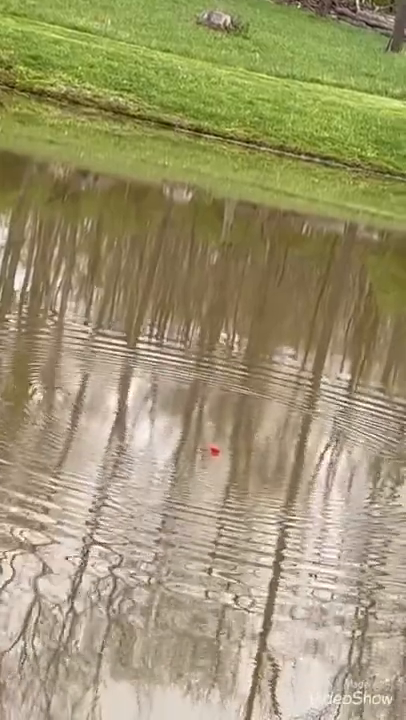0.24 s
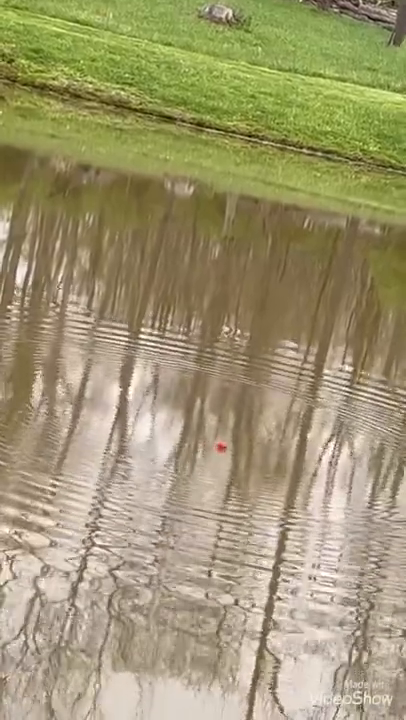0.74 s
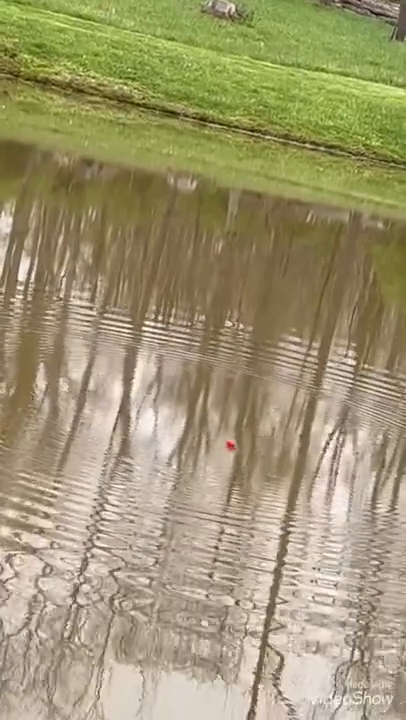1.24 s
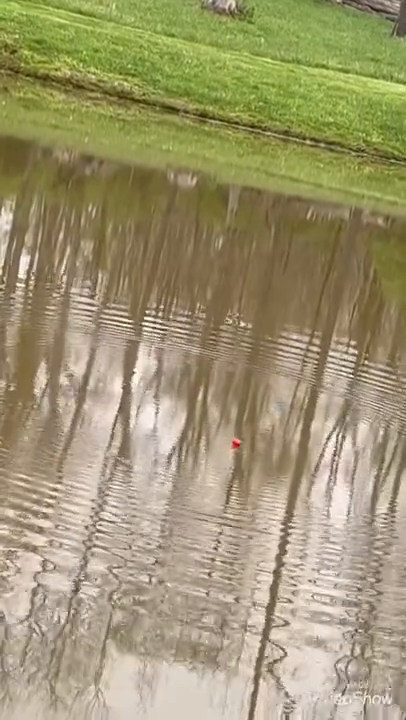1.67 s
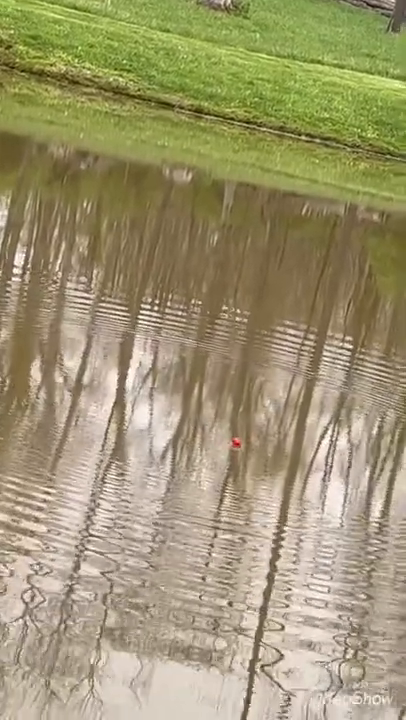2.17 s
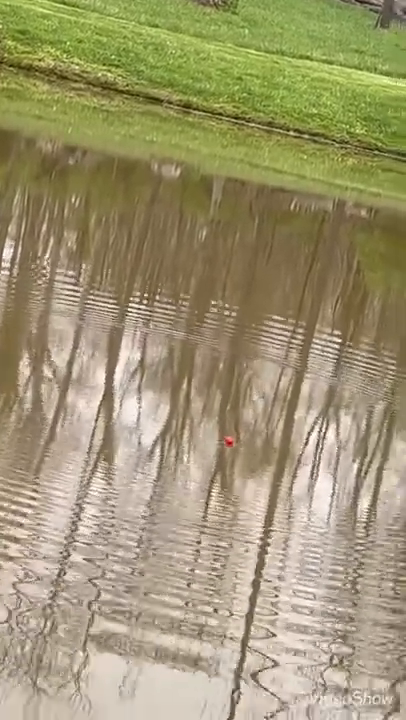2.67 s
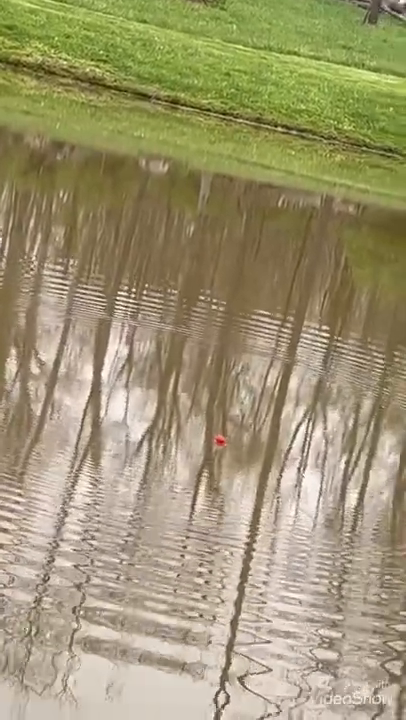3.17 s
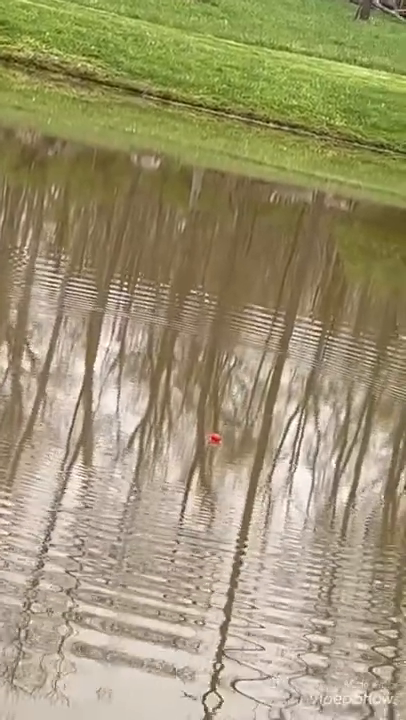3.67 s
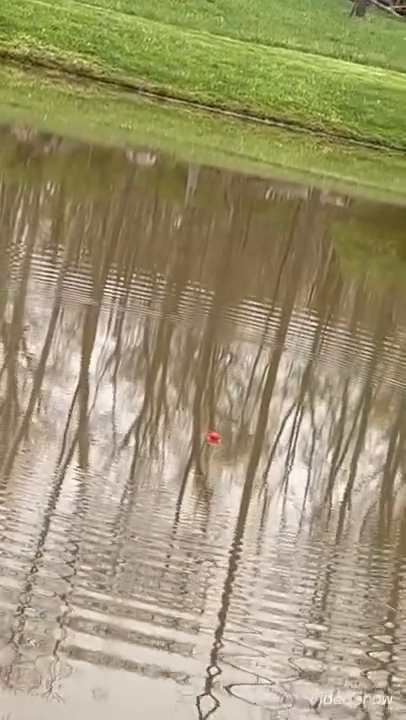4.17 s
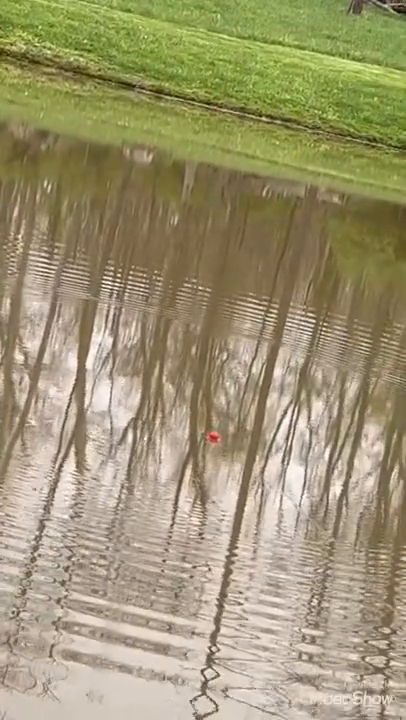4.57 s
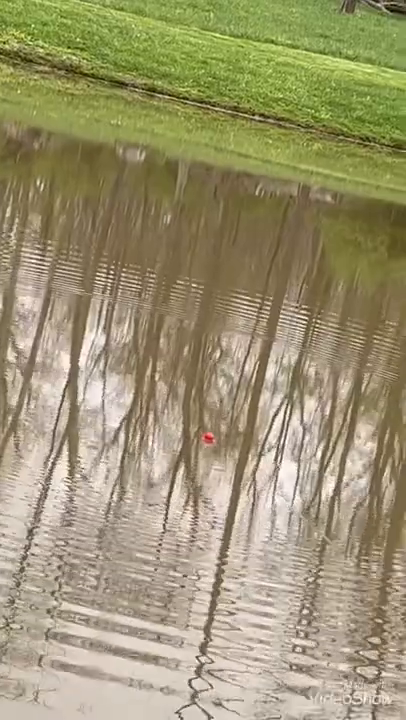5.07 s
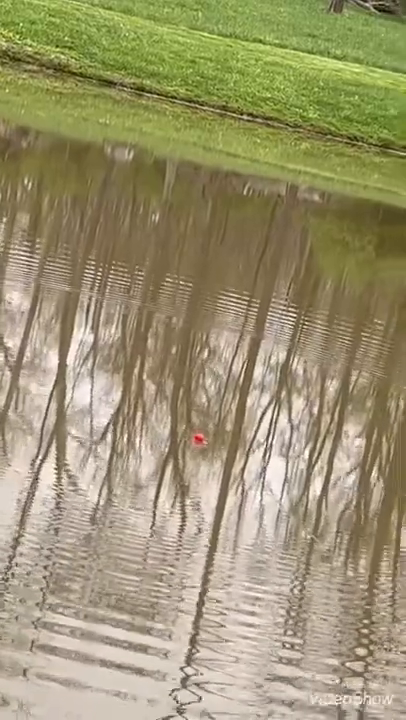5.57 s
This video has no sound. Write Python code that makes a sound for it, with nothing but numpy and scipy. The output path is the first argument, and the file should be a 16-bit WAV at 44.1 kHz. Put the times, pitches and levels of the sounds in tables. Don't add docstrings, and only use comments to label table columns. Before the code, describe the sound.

Birds whistle and trill around a wooded pond over a low traffic rumble and a wavering motor hum, with three tiny twig clicks.

```python
import sys
import numpy as np
from scipy import signal
from scipy.fft import rfft, irfft, next_fast_len
from scipy.io import wavfile
from scipy.ndimage import uniform_filter1d

SR = 44100
rng = np.random.default_rng(int(sys.argv[2]) if len(sys.argv) > 2 else 0)


def gain_from_db(level_db):
    decades = np.asarray(level_db, float) / 20
    return 10 ** decades


def digitize_waveform(pressure):
    field = np.atleast_2d(pressure).T
    bounded = np.clip(field, -1, 1)
    quanta = np.round(bounded * 32767).astype(np.int16)
    wavfile.write(sys.argv[1], SR, quanta)


N = 256662

# (time in note [s], pitch [Hz], level under top [dB])
NOTE_SHAPES = dict( flick=[(0, 4050, 3), (.008, 4650, -3), (.02, 5230, -2.5), (.03, 5700, -10)],
               hold=[(0, 3150, -9), (.011, 3300, -2), (.021, 3243, -2), (.032, 3200, -15.5)],
               dip=[(0, 2800, -10.5), (.014, 2620, -6), (.028, 2380, -3), (.042, 2334, -8)],
               lift=[(0, 2330, -19), (.012, 2540, -5.5), (.024, 2850, -1), (.036, 3010, -7.5)],
               droop=[(0, 2315, -6), (.018, 2490, 1), (.035, 2370, -3), (.053, 2096, -5.5),
               (.068, 1802, -17), (.088, 1520, -15.5), (.11, 1410, -22.5)])
# (start [s], note name, top level [dB])
NOTES_SUNG = [(0.077, "flick", -61), (0.162, "hold", -55), (0.212, "dip", -46.5), (0.299, "lift", -48.5),
              (.362, "droop", -49.5), (.597, "flick", -64), (0.688, "hold", -53), (0.739, "dip", -47.5),
              (0.827, "lift", -48), (0.894, "droop", -51), (5.043, "flick", -67), (5.13, "hold", -55.5),
              (5.182, "dip", -49.5), (5.267, "lift", -51), (5.334, "droop", -51), (5.553, "flick", -64),
              (5.641, "hold", -48.5), (5.692, "dip", -45), (5.776, "lift", -49.5)]


def near_bird():
    return whistle([placed(NOTE_SHAPES[note], s, db) for s, note, db in NOTES_SUNG], edge_s=.003)


# (time in slur [s], pitch [Hz], level under top [dB])
SLUR_HALVES = [
    [(0, 2950, -8), (.013, 3010, -0.5), (.025, 3340, -11), (.036, 3590, -1.5)],
    [(.05, 3580, -13), (.06, 2900, 1), (.075, 2650, -8.5), (.105, 2240, -11), (.145, 1985, -8.5),
     (.188, 1820, -14)],
]
# (start [s], top level [dB])
SLUR_STARTS = [
    (2.036, -61),
    (4.403, -67),
]
# (start [s], length [s], from [Hz], to [Hz], top level [dB])
SETTLING_NOTES = [(.915, .13, 3180, 2860, -66), (1.425, .04, 3590, 3150, -68),
                  (1.47, 0.047, 2330, 2240, -72), (1.53, 0.064, 2220, 2180, -72.5),
                  (1.595, .045, 2874, 2580, -65), (1.715, 0.057, 2190, 2200, -75.5),
                  (1.985, 0.048, 2610, 2640, -71), (3.825, .025, 3010, 2950, -86),
                  (4.235, .07, 3270, 3220, -89.5), (4.35, .045, 2760, 2700, -78),
                  (4.35, .045, 2400, 2390, -82), (4.885, .06, 3560, 2888, -68),
                  (4.95, 0.081, 2840, 2850, -69)]
# (start [s], length [s], from [Hz], to [Hz], top level [dB])
STRAIGHT_NOTES = [
    (.362, .04, 2850, 3585, -66),
    (3.635, 0.06, 3510, 2436, -89),
    (4.995, .065, 2806, 2207, -68.5),
]


def far_bird():
    notes = [placed(half, s, db) for s, db in SLUR_STARTS for half in SLUR_HALVES]
    notes += [glide(*row, settle=3.8) for row in SETTLING_NOTES]
    notes += [glide(*row, settle=.3) for row in STRAIGHT_NOTES]
    shimmer_db = 3.5 * evened(resonate(rng.standard_normal(N), 0, 120))
    return whistle(notes, edge_s=0.0048) * gain_from_db(shimmer_db)


def placed(shape, s, db):
    return np.add(shape, [s, 0, db])


def glide(s, length, from_hz, to_hz, db, settle):
    u = np.linspace(0, 1, 10)
    settled = (1 - np.exp(-settle * u)) / (1 - np.exp(-settle))
    level_db = db + np.interp(u, [0, 1 / 3, 1], [-7.5, 0, -1])
    return np.transpose([s + length * u, from_hz + (to_hz - from_hz) * settled, level_db])


def whistle(notes, edge_s):
    out = np.zeros(N)
    for rows in notes:
        s, hz, db = np.transpose(rows)
        t = np.arange(s[0] - edge_s, s[-1] + edge_s, 1 / SR)
        pitch = uniform_filter1d(np.interp(t, s, hz), size=300)
        ends = np.clip(np.minimum(t - t[0], t[-1] - t) / (2 * edge_s), 0, 1)
        tone = np.sqrt(2) * np.sin(2 * np.pi * np.cumsum(pitch) / SR)
        add(out, t[0], gain_from_db(np.interp(t, s, db)) * ends * tone)
    return out


# (time [s], level [dB], middle pitch [Hz])
TRILL_COURSE = [(0, -75.5, 4000), (.8, -71.5, 3990), (1.2, -77.5, 4150), (1.5, -73.5, 4090),
                (2, -70.5, 3997), (2.4, -71.5, 4020), (2.8, -73, 3910), (3.6, -73, 4016), (4.5, -71, 4004),
                (4.8, -72.5, 4140), (5.3, -74.5, 4120), (5.5, -71, 4050), (5.82, -70.5, 4040)]
# (first chip [s], last chip [s], chips [count])
CHIP_RUNS = [(.02, .057, 2), (.112, .217, 4), (.277, .421, 5), (.493, .736, 8), (.79, .968, 6),
             (1.098, 1.312, 8), (1.347, 2.009, 21), (2.035, 2.134, 4), (2.194, 2.437, 8), (2.477, 2.55, 3),
             (2.605, 2.712, 4), (2.773, 2.984, 7), (3.052, 3.225, 6), (3.261, 3.523, 8), (3.578, 3.866, 9),
             (3.911, 4.02, 4), (4.074, 4.214, 5), (4.29, 4.732, 13), (4.764, 5.525, 24), (5.592, 5.795, 7)]
# (first chip [s], last chip [s], chips [count], level [dB])
ANSWER_RUNS = [
    (.951, 1.055, 4, -4),
    (1.626, 1.692, 3, -2),
    (2.144, 2.312, 6, -2),
    (3.507, 4.297, 25, -3),
    (4.46, 4.56, 4, -1),
    (5.441, 5.54, 4, -1),
]


def trill(fall_hz=40000, length_s=.02, spread=.009, uneven_db=1.5, answer_up_hz=129.8):
    out = np.zeros(N)
    t = np.arange(-length_s / 2, length_s / 2, 1 / SR)
    level_db, hz = curves(TRILL_COURSE)
    chips = [(s, 0, 0) for run in CHIP_RUNS for s in np.linspace(*run)]
    chips += [(s, db, answer_up_hz) for *run, db in ANSWER_RUNS for s in np.linspace(*run)]
    chances = rng.standard_normal((len(chips), 4))
    for (s, db, up_hz), (pitch, slope, size, path) in zip(chips, chances):
        middle_hz = hz[round(s * SR)] * (1 + spread * pitch) + up_hz
        turns = middle_hz * t - fall_hz * (1 + .1 * slope) * t ** 2 / 2
        chip = gain_from_db(db + uneven_db * size) * np.hanning(len(t)) * np.cos(2 * np.pi * turns)
        start = s - (middle_hz - 4050) / fall_hz + t[0]
        add(out, start, chip)
        add(out, start + .003 + .002 * abs(path), gain_from_db(-9) * chip)
    return gain_from_db(level_db + 4.5) * out


# (time [s], level [dB], brightness [dB per octave])
TWIG_TICKS = [
    (0.4938, -63, 0),
    (1.269, -63, -2),
    (4.0888, -60, -1.5),
]
# (frequency [Hz], width [Hz], level [dB])
TWIG_MODES = [(1370, 430, 8.5), (3540, 750, -3), (6350, 360, 11), (8840, 1100, -28), (11800, 2600, -3.5),
              (16030, 1900, -7.5)]


def ticks(snap_s=.0011, tail_s=.008, tail_db=-21):
    out = np.zeros(N)
    t = np.arange(3000) / SR
    for s, db, bright_db in TWIG_TICKS:
        decay = np.exp(-t / snap_s) + gain_from_db(tail_db) * np.exp(-t / tail_s)
        burst = rng.standard_normal(len(t)) * decay
        ring = sum(gain_from_db(mode_db + bright_db * np.log2(hz / 3000)) * resonate(burst, hz, width)
                   for hz, width, mode_db in TWIG_MODES)
        add(out, s, gain_from_db(db + 15.0) * ring)
    return out


# (frequency [Hz], density [dB per Hz])
LEAF_SPECTRUM = [(700, -38), (1500, 7), (4500, 3.5), (7000, 2), (8400, 0.5), (9500, -2.5), (12000, -2),
                 (15300, -15), (16200, -34.5)]
# (time [s], top level [dB], rise [s], fall [s])
LEAF_GUSTS = [
    (.1, -75, 0.26, 0.37),
    (.49, -64, 0.11, 0.031),
    (.95, -72.5, 0.13, 0.072),
]


def leaves():
    return swells(LEAF_GUSTS, rest_db=-89) * noise(LEAF_SPECTRUM, patchy_db=2.5, size=512)


# (frequency [Hz], density [dB per Hz])
CHORUS_SPECTRUM = [(1400, -18.5), (1900, -4), (2400, 5), (3000, -1.5), (3600, -12), (5500, -30),
                   (6200, -46)]
# (time [s], top level [dB], rise [s], fall [s])
CHORUS_BOUTS = [
    (0, -57.5, .3, .3),
    (1.0, -59.5, .6, .3),
    (2.3, -70, .25, .25),
    (4.7, -78.5, .2, .2),
    (5.82, -68.5, .5, .3),
]


def distant_chorus():
    return swells(CHORUS_BOUTS, rest_db=-98) * gain_from_db(-7.0) * noise(CHORUS_SPECTRUM, patchy_db=1.2, size=512)


# (frequency [Hz], wander [Hz], level [dB])
MOTOR_TONES = [
    (122.3, 2, -4),
    (444, 6, -4.5),
    (551.5, 4, -7),
    (583.5, 6, -2),
]
# (time [s], top level [dB], half-length [s])
MOTOR_SWELLS = [
    [(1.12, -57, 0.094), (1.57, -51.5, 0.25), (2.01, -46.5, 0.16), (2.95, -44.5, .2), (3.42, -44, 0.24),
     (4.05, -53, 0.1), (4.55, -54.5, .2), (5.1, -47, .3), (5.58, -46, .15)],
    [(.3, -66, 0.21), (1.34, -65.5, .2), (2.0, -67, .25)],
    [(.33, -58, 0.12), (2.4, -60.5, 0.32), (2.7, -56, 0.16), (3.1, -55.5, 0.24), (3.95, -68, 0.26),
     (5.82, -66, .15)],
    [(.2, -58, 0.17), (.78, -54, 0.27), (1.34, -57, 0.15), (2.27, -53, 0.27), (2.6, -54, 0.11),
     (3.3, -62.5, 0.18), (3.8, -64.5, 0.11), (4.35, -63.5, 0.32), (4.76, -60, 0.45), (5.5, -62, .3)],
]
MOTOR_REST = [
    -66,
    -78.5,
    -76,
    -70,
]


def drone(flutter_db=4.0):
    out = np.zeros(N)
    for rows, rest_db, (hz, wander_hz, trim_db) in zip(MOTOR_SWELLS, MOTOR_REST, MOTOR_TONES):
        drift, flutter = (evened(resonate(resonate(rng.standard_normal(N), 0, 30), 0, 30)) for _ in range(2))
        tone = np.sqrt(2) * np.sin(2 * np.pi * np.cumsum(hz + wander_hz * drift) / SR)
        out += swells(rows, rest_db) * gain_from_db(trim_db + flutter_db * flutter) * tone
    return out


# (time [s], level [dB])
BASS_COURSE = [(0.0, -46), (0.45, -45.5), (0.9, -44.5), (1.34, -45), (1.79, -45), (2.24, -45.5),
               (2.69, -44.5), (3.13, -44), (3.58, -48.5), (4.03, -45), (4.48, -45), (4.92, -47),
               (5.37, -46.5), (5.82, -44.5)]
# (frequency [Hz], density [dB per Hz])
TRAFFIC_SPECTRUM = [(12, -47.5), (20, -22), (57, 1.5), (117, -0.5), (226, -11.5), (407, -23), (488, -26),
                    (585, -15), (670, -22.5), (785, -21.5), (1180, -33.5), (1700, -51), (3340, -57.5),
                    (4010, -51.5), (4490, -59), (5840, -89.5), (9880, -120)]
# (frequency [Hz], level [dB])
DIFFUSE_SHARE = [(100, -40), (300, -11.5), (750, -7.5), (1100, -5), (1600, -5), (2000, -22.5), (5000, -21)]


def rumble():
    air = noise(TRAFFIC_SPECTRUM, patchy_db=1.43, size=2048)
    apart = noise(TRAFFIC_SPECTRUM, patchy_db=-1.1, size=2048)
    bass = signal.sosfiltfilt(signal.butter(2, 300, fs=SR, output="sos"), air)
    apart = irfft(rfft(apart) * gain_from_db(read(DIFFUSE_SHARE, np.fft.rfftfreq(N, 1 / SR))), N)
    wash = air - bass + np.array([apart, -apart])
    return gain_from_db(curves(BASS_COURSE)[0] - 0.54) * bass + gain_from_db(-46.5) * wash


# (frequency [Hz], 60 dB decay time [s])
WOODS_DECAY = [(1000, 0.77), (2500, 1.45), (4000, 0.61), (6000, 1.2), (12000, 0.082)]


def woods(x, bank_s, spread_s, bank_db):
    taps = np.zeros(2 * SR)
    at = np.arange(600, 2 * SR - 40, 40)
    bank = gain_from_db(bank_db * np.exp(-((at / SR - bank_s) / spread_s) ** 2))
    taps[at + rng.integers(0, 40, len(at))] = bank * rng.standard_normal(len(at))
    hz, t, z = signal.stft(taps, SR, nperseg=256)
    t60 = np.maximum(read(WOODS_DECAY, hz), .05)[:, None]
    tail = signal.istft(z * gain_from_db(-60 * t / t60), SR, nperseg=256)[1]
    return signal.fftconvolve(x, tail / np.linalg.norm(tail))[:N]


def pond_echoes(near, far, chips, twigs):
    close = gain_from_db(-11) * near + gain_from_db(-17) * chips + gain_from_db(-26) * twigs
    out = woods(close, bank_s=.09, spread_s=.09, bank_db=5)
    out += woods(gain_from_db(-7.5) * far, bank_s=0.29, spread_s=0.14, bank_db=11.5)
    tree_line = resonate(resonate(far, 2050, 1100), 2050, 1100)
    far_shore = resonate(resonate(near, 2700, 2400), 2700, 2400)
    add(out, .235, gain_from_db(-9) * tree_line)
    add(out, .057, gain_from_db(-14) * far_shore)
    return out


def evened(x):
    return x / np.sqrt(np.mean(x ** 2) + 1e-20)


def read(points, hz):
    f, value = np.transpose(points)
    return np.interp(np.log(hz + 1), np.log(f + 1), value)


def curves(rows):
    s, *columns = np.transpose(rows)
    return [np.interp(np.arange(N) / SR, s, c) for c in columns]


def add(mix, s, sound):
    part = mix[round(s * SR):][:len(sound)]
    part += sound[:len(part)]


def resonate(x, hz, width):
    turn = np.exp(2j * np.pi * hz * np.arange(len(x)) / SR)
    r = np.exp(-np.pi * width / SR)
    return 2 * (turn * signal.lfilter([1 - r], [1, -r], x / turn)).real


def noise(spectrum, patchy_db, size):
    frames = 4 * N // size + 5
    hz = np.fft.rfftfreq(size, 1 / SR)
    a, b, patches = rng.standard_normal((frames, len(hz), 3)).T
    patches = evened(uniform_filter1d(uniform_filter1d(patches, size=8, axis=0), size=8, axis=1))
    z = (a + 1j * b) * gain_from_db(read(spectrum, hz)[:, None] + patchy_db * patches)
    return evened(signal.istft(z, nperseg=size, noverlap=3 * size // 4)[1][:N])


def swells(rows, rest_db):
    t = np.arange(N) / SR
    power = gain_from_db(rest_db) ** 2
    for s, db, *ends in rows:
        reach = np.where(t < s, ends[0], ends[-1])
        power = power + gain_from_db(db - 6 * ((t - s) / reach) ** 2) ** 2
    return np.sqrt(power)


def scene():
    near, far, chips, twigs = near_bird(), far_bird(), trill(), ticks()
    birds_and_twigs = near + far + chips + twigs
    echoes = pond_echoes(near, far, chips, twigs)
    return birds_and_twigs + echoes + leaves() + distant_chorus() + drone() + rumble()


def band_limit(x):
    return signal.sosfilt(signal.butter(12, 16400, fs=SR, output="sos"), x)


# (frequency [Hz], lead [rad])
PORT_LEAD = [(0, 0), (150, -.07), (900, -.95), (1100, -.3), (1650, -.35), (2150, 1), (2450, 2),
             (2650, 2.15), (3250, 1.4), (3900, .9), (4800, 1.5), (6000, 3.14), (8300, 6.3), (15000, 15.9)]
# (frequency [Hz], difference [dB])
PORT_TILT = [(100, 0), (300, -.2), (570, 2.3), (680, .6), (980, -2.2), (1500, -.7), (1900, 1.1), (3000, 0)]


def record(dry):
    dry = signal.sosfilt(signal.butter(3, 45, "high", fs=SR, output="sos"), dry)
    size = next_fast_len(N + 4096)
    hz = np.fft.rfftfreq(size, 1 / SR)
    lead = np.interp(hz, *np.transpose(PORT_LEAD))
    half = gain_from_db(read(PORT_TILT, hz) / 2) * np.exp(.5j * lead)
    ports = irfft(rfft(dry, size) * np.array([half, 1 / half]), size)[:, :N]
    return band_limit(ports)


dry = scene()
out = record(dry)
digitize_waveform(out)
```